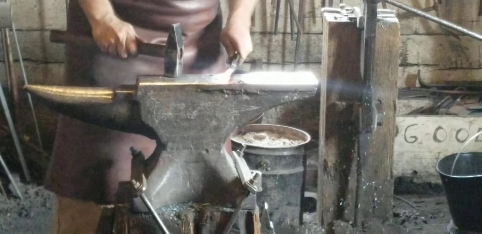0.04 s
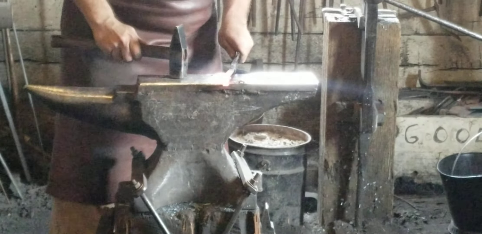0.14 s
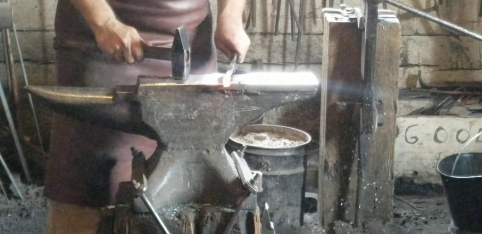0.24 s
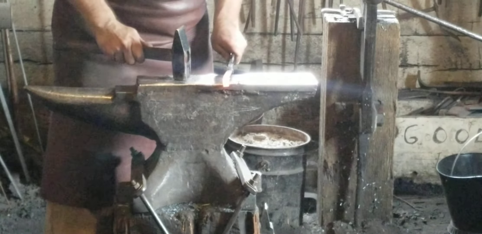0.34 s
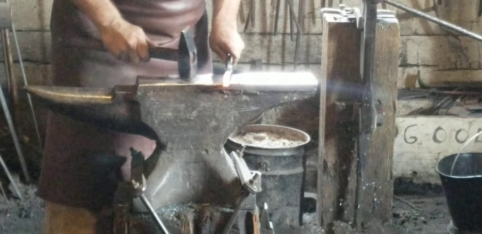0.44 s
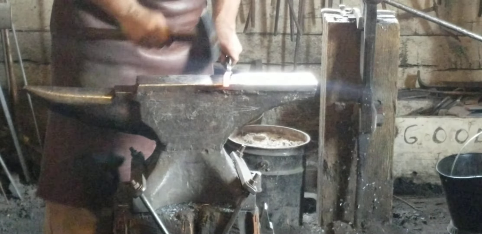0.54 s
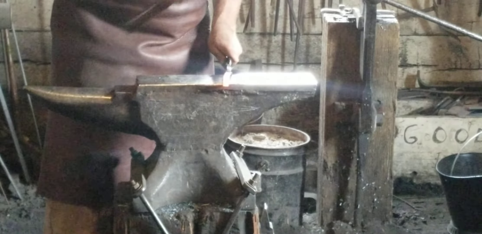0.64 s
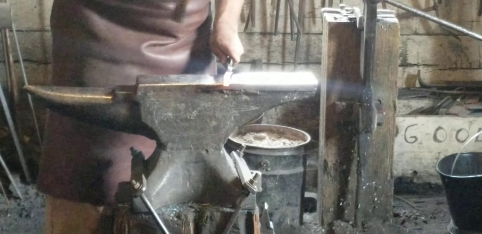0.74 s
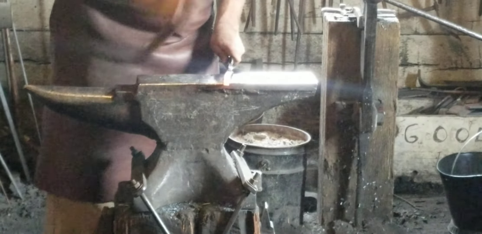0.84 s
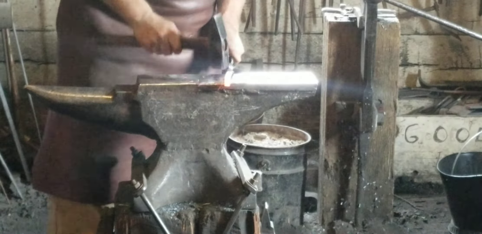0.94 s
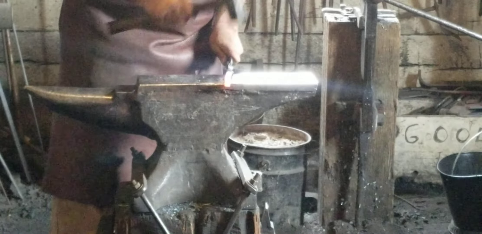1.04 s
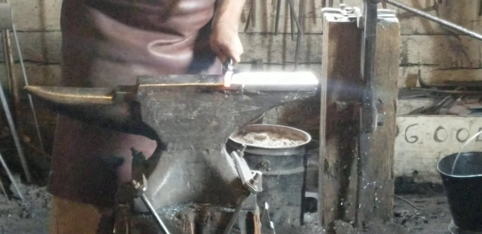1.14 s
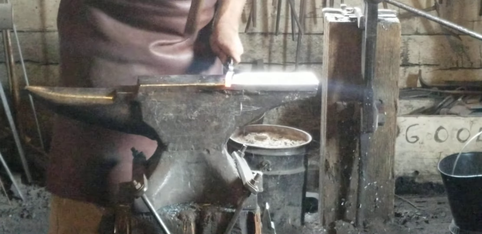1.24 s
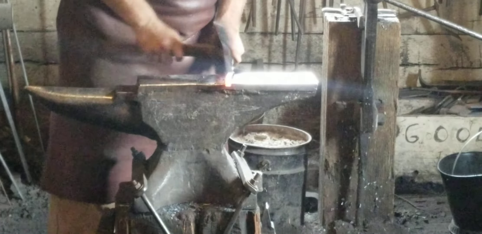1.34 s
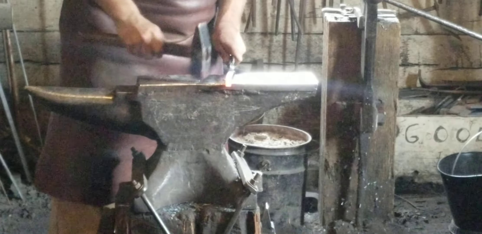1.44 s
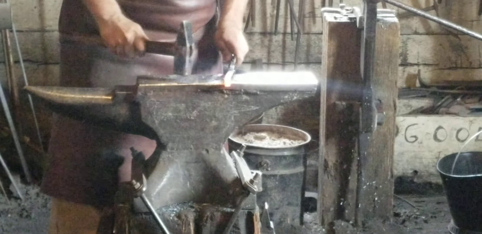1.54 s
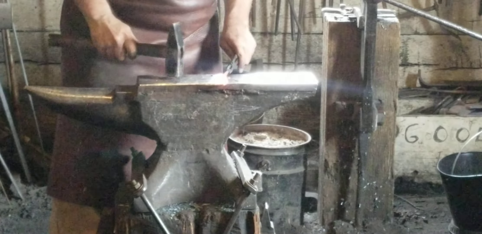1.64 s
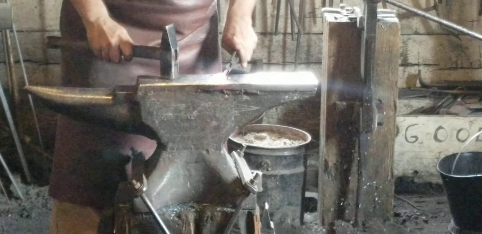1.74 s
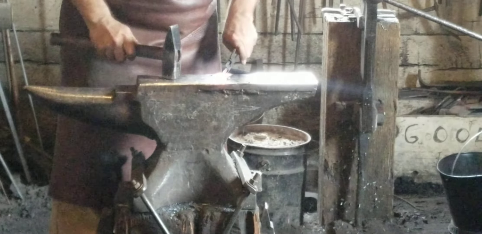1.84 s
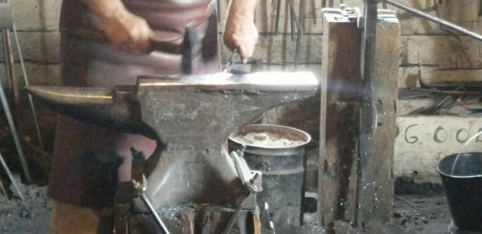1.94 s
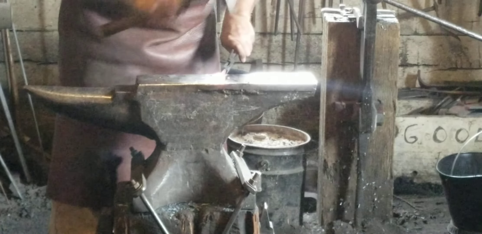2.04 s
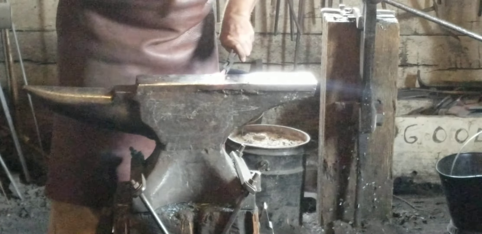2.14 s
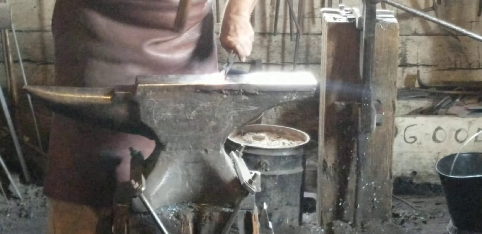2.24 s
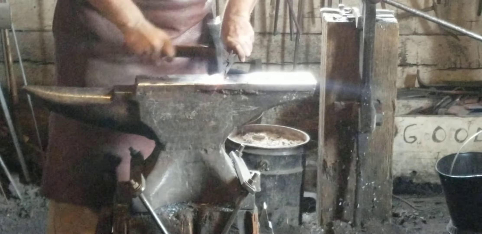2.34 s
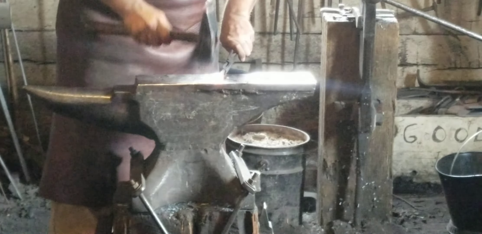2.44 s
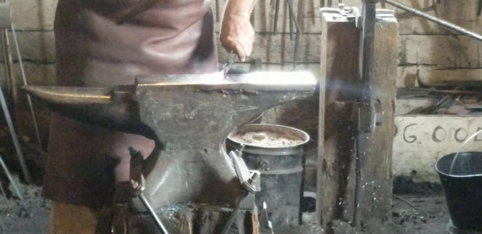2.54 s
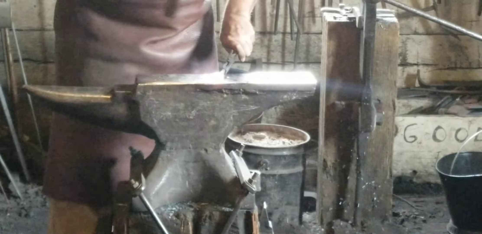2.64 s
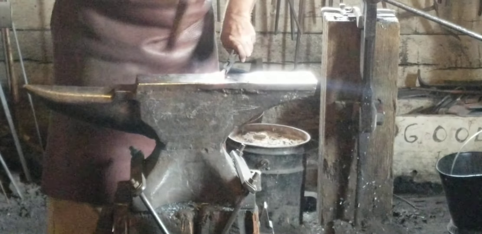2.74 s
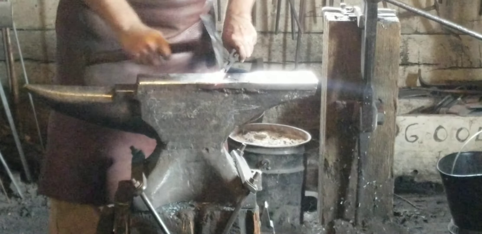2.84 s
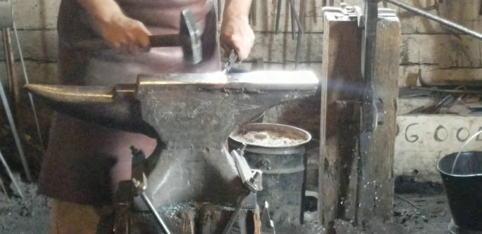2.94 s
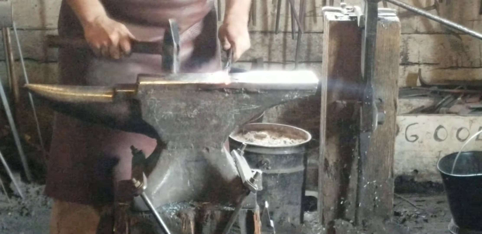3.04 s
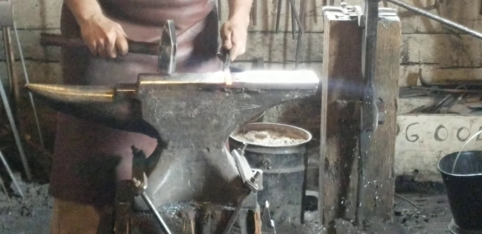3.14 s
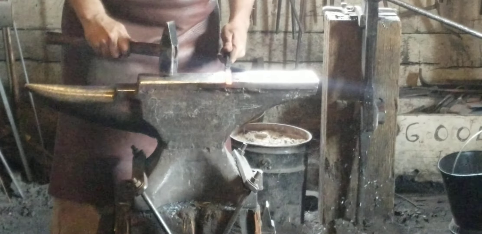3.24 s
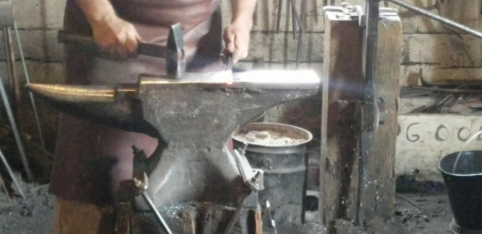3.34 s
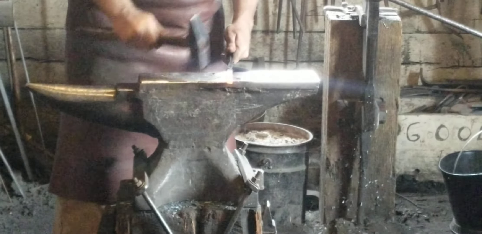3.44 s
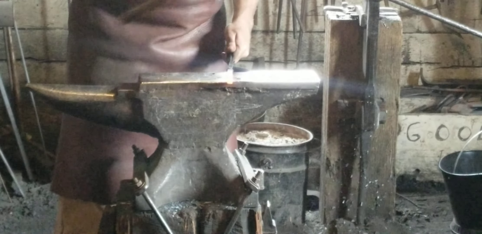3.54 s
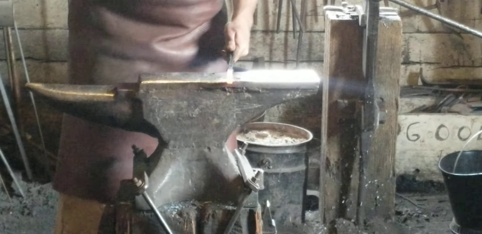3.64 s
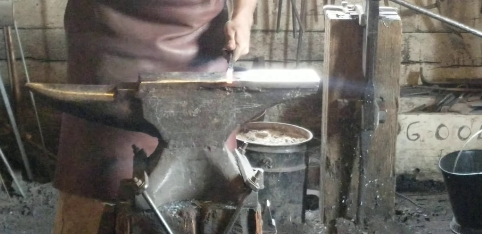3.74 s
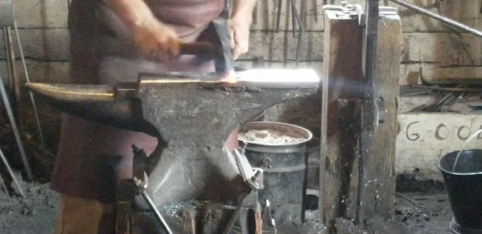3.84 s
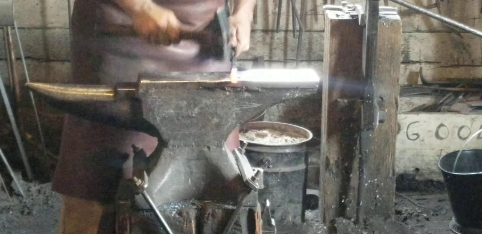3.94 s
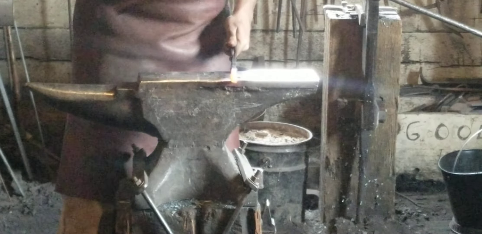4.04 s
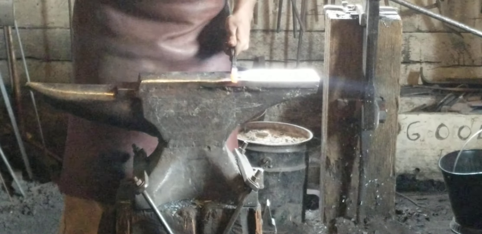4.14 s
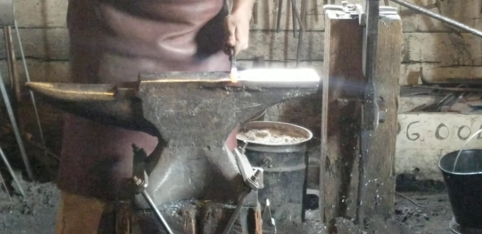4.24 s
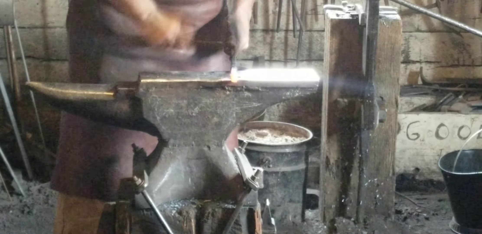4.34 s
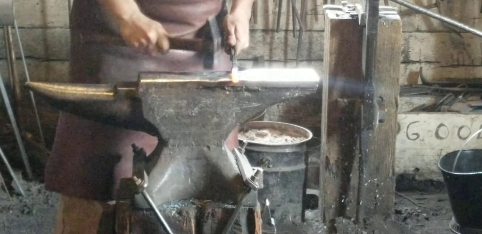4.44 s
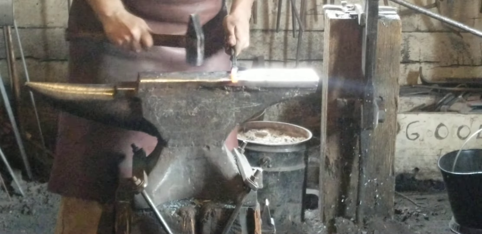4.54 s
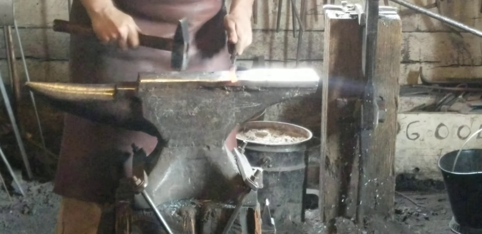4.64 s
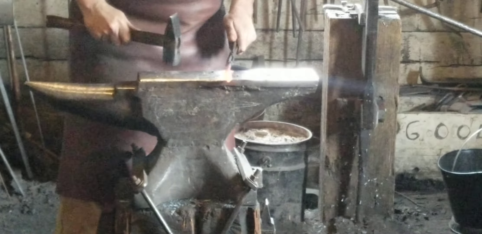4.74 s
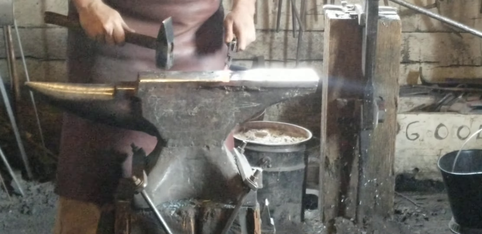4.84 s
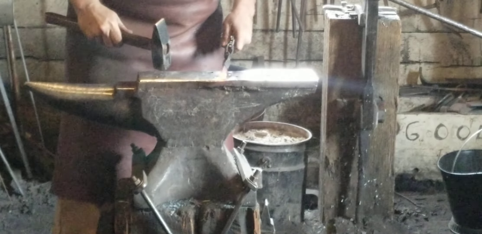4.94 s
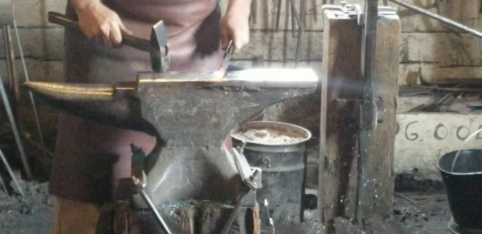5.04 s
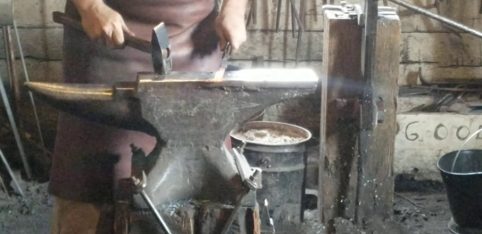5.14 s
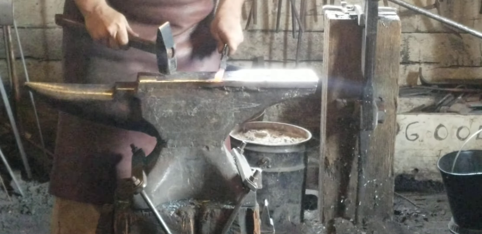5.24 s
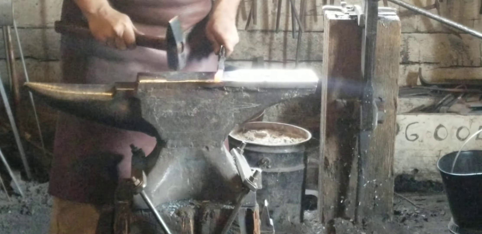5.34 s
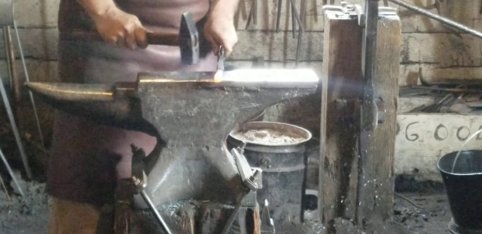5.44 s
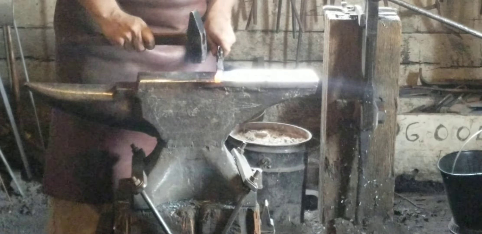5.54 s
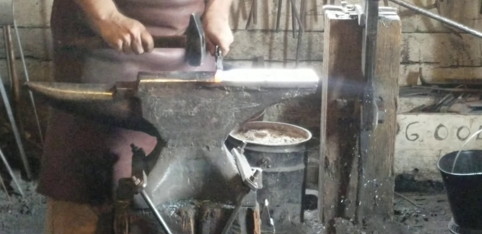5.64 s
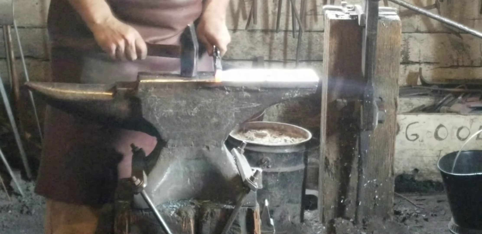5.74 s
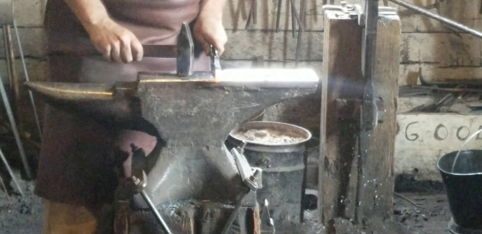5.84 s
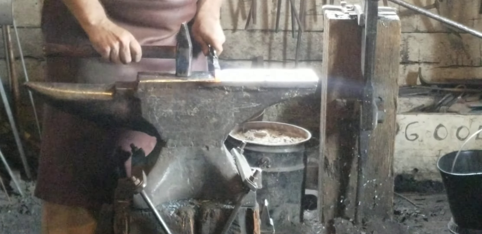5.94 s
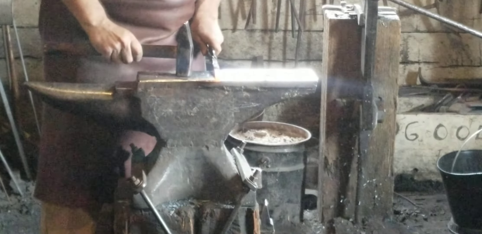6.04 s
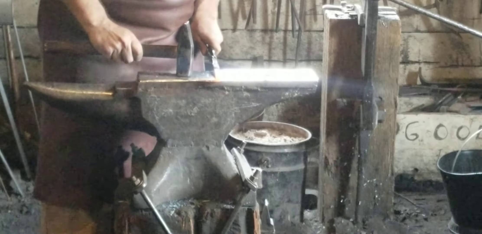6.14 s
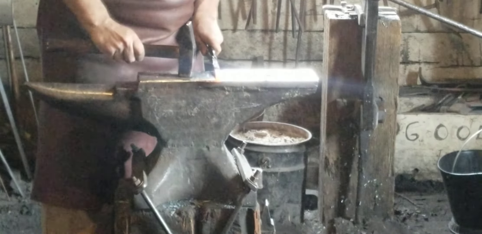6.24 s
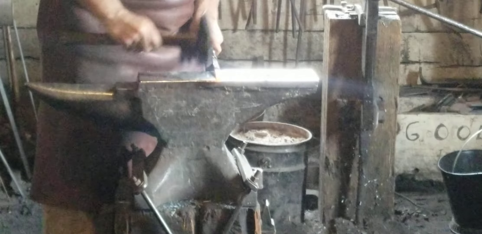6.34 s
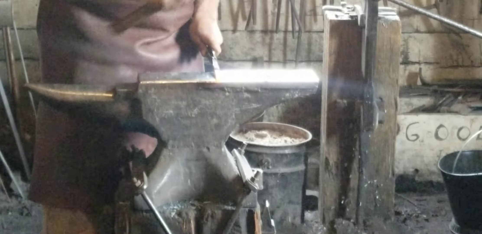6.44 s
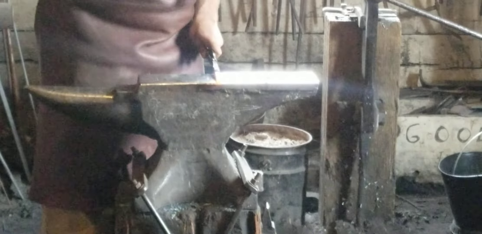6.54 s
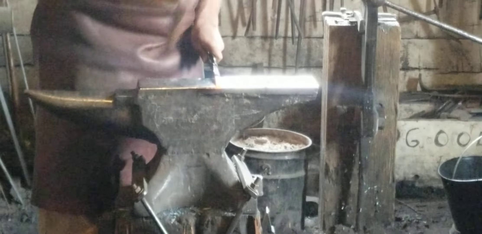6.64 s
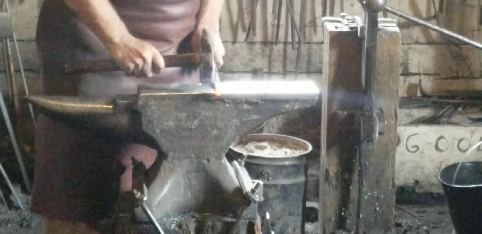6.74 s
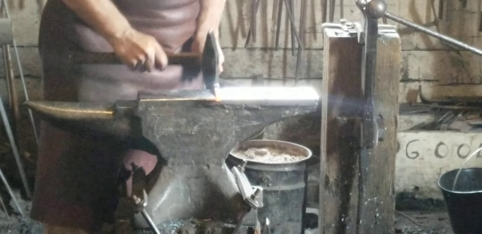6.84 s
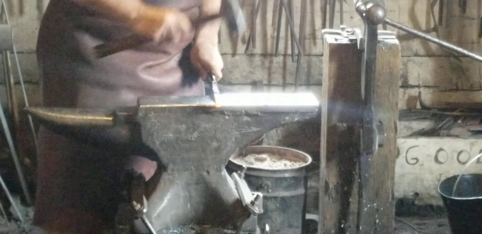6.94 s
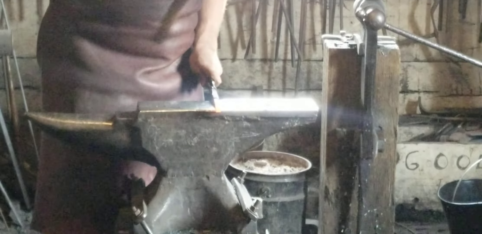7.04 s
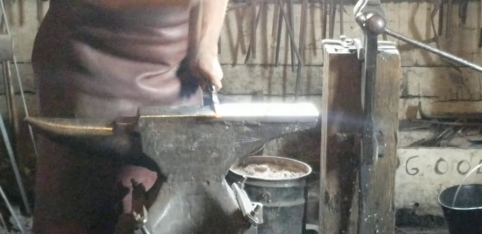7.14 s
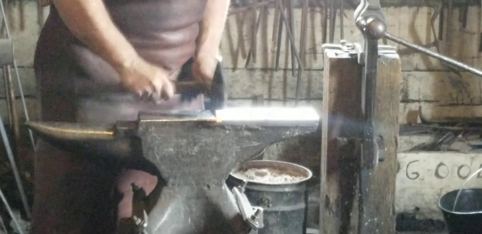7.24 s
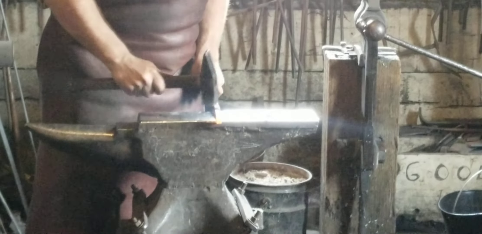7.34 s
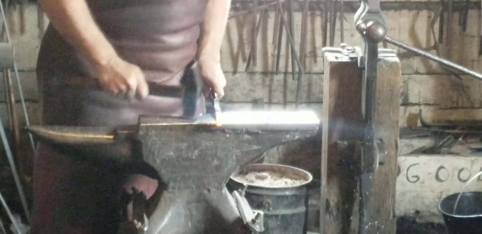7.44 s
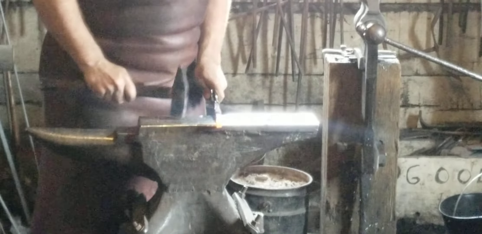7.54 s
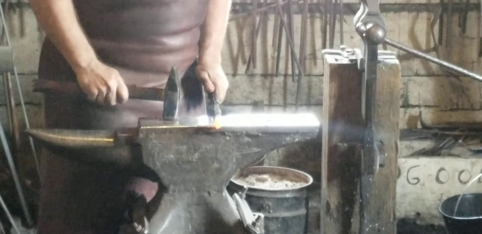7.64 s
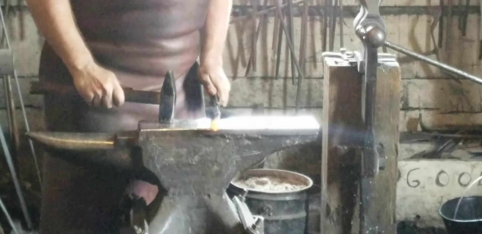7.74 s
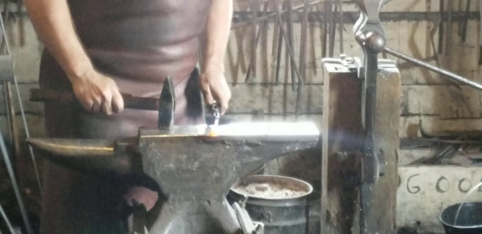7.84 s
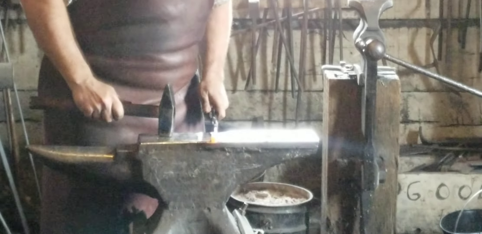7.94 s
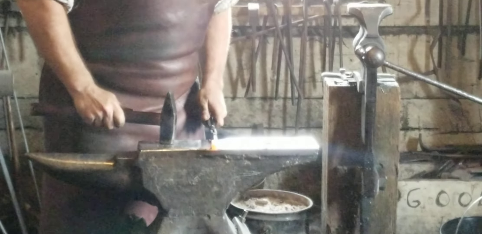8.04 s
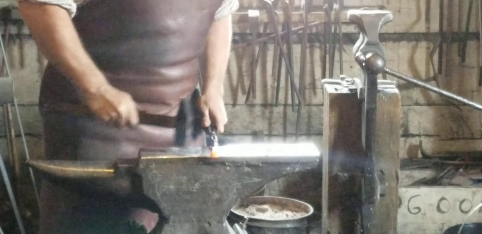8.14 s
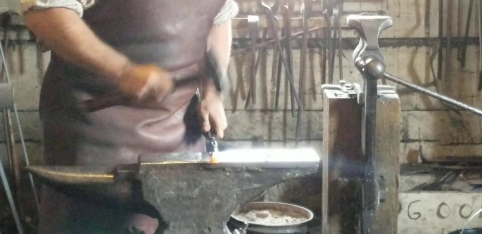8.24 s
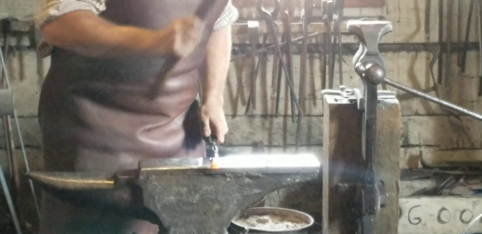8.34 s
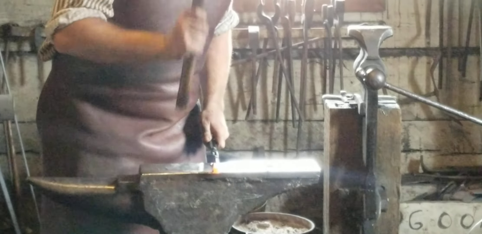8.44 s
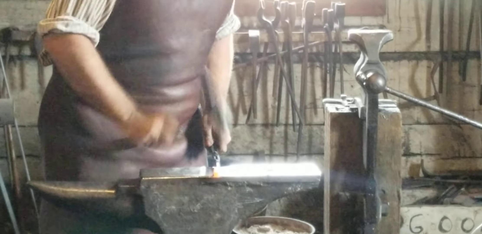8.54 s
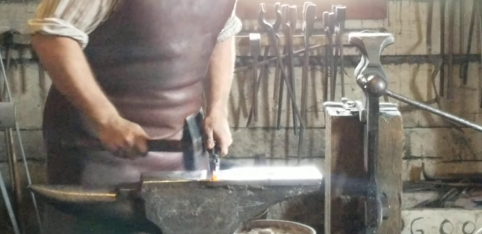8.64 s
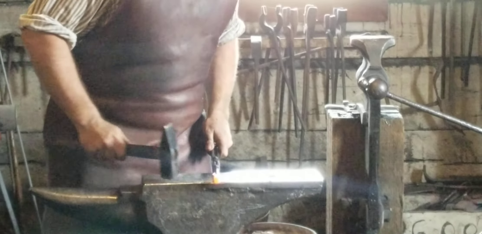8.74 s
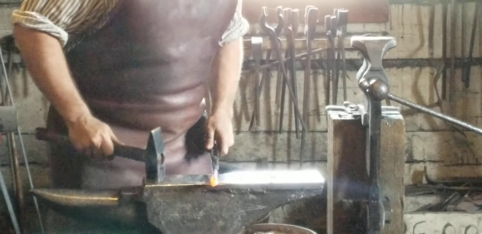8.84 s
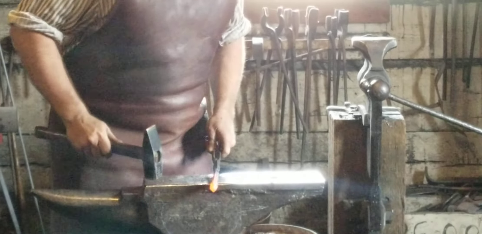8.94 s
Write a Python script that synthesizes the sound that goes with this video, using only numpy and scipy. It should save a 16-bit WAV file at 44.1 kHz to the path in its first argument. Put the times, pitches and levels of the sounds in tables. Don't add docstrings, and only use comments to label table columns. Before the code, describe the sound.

A hand hammer strikes steel on an anvil in spaced pairs of sharp clanks with lighter bounces, over a low blower hum in a workshop.

```python
import sys
import numpy as np
from scipy import signal
from scipy.fft import rfft, irfft
from scipy.io import wavfile
from scipy.ndimage import uniform_filter1d

SR = 44100
rng = np.random.default_rng(int(sys.argv[2]) if len(sys.argv) > 2 else 0)


def store_wav(level_fs):
    pcm = np.round(np.clip(np.atleast_2d(level_fs), -1, 1) * 32767)
    wavfile.write(sys.argv[1], SR, pcm.T.astype(np.int16))


def invert_db(x):
    u = np.asarray(x, float) / 20
    return 10 ** u


N = 396018
TIME_S = np.arange(N) / SR

# start_s, crack_db, anvil_db, head_db, tongs_db
BLOWS = [
    (0.9, -24, -20, -56, -44.5),
    (1.348, -19, -17, -63.5, -47.5),
    (2.35, -21, -16.5, -55.5, -32.5),
    (2.833, -18.5, -15, -38.5, -61),
    (3.848, -21, -17, -61.5, -31.5),
    (4.36, -18.5, -16, -46.5, -21.5),
    (6.719, -27, -28.5, -81, -39),
    (7.25, -20, -16.5, -48.5, -47.5),
    (8.568, -21, -26, -39, -39),
]
# start_s, crack_db, heel_db, anvil_db, tongs_db
BOUNCES = [
    (1.6096, -33, -77, -46, -42),
    (1.6876, -31, -39.5, -37, -31),
    (3.036, -30, -41.5, -64, -32.5),
    (3.15, -32.5, -71, -34, -43.5),
    (4.6558, -34.5, -74, -33.5, -39.5),
    (5.7534, -35.5, -41.5, -52, -73),
    (7.4633, -35, -43, -44.9, -71),
    (7.5717, -34.5, -41, -70, -56),
]
# pitch_hz, level_db, t60_s
ANVIL_MODES = [(1650, -15, .15), (1950, -11, .2), (2394, -10, .15), (2475, -7, .14), (2507, 0, .15),
               (2525, -9, .22), (3290, -17, .15), (5790, -20, .2)]
# pitch_hz, level_db, t60_s
HEEL_MODES = [(1309, -7, .6), (1319, 0, .85), (1502, -10, .5), (1800, -14, .3), (3876, -20, .25)]
# pitch_hz, level_db, t60_s
HEAD_MODES = [(8510, -3, .3), (10480, -2.5, .3), (13110, -5, .2), (13150, 0, .3)]
# pitch_hz, level_db, t60_s
TONGS_MODES = [(10146, -11, .3), (10158, 0, .48)]
BLOW_S = np.array(BLOWS)[:, 0]


def rms_one(x):
    return x / np.sqrt(np.mean(x ** 2) + 1e-20)


def at_hz(points, hz):
    point_hz, value = np.transpose(points)
    return np.interp(np.log(hz + 1), np.log(point_hz), value)


def shares(centres_hz, size):
    log_hz = np.log(np.fft.rfftfreq(size, 1 / SR) + 1)
    return [np.interp(log_hz, np.log(centres_hz), row) for row in np.eye(len(centres_hz))]


def band(x, low_hz, high_hz):
    return signal.sosfilt(signal.butter(2, [low_hz, high_hz], "band", fs=SR, output="sos"), x)


def drift(rate_hz):
    steps = rng.standard_normal(1000)
    return np.interp(TIME_S * rate_hz, np.arange(len(steps)), steps)


def clicks(times_s, db):
    out = np.full(N, 1e-18)
    out[np.round(np.array(times_s) * SR).astype(int)] = invert_db(np.array(db))
    return out


def stereo_noise(spectrum, likeness, size):
    hz = np.fft.rfftfreq(size, 1 / SR)
    mid, side = rfft(rng.standard_normal((2, size)))
    alike = np.clip(at_hz(likeness, hz), -1, 1)
    pair = np.sqrt(1 + alike) * mid + np.sqrt(1 - alike) * side * [[1], [-1]]
    return rms_one(irfft(pair * invert_db(at_hz(spectrum, hz)), size))


def blows():
    s, crack_db, anvil_db, head_db, tongs_db = np.transpose(BLOWS)
    top_db = crack_db - 12
    body_db = (crack_db + top_db) / 2 + 37.5
    anvil = ring(s, anvil_db + 4, ANVIL_MODES, spread_db=-1.0, hold=3.8)
    bodies = ring(s, crack_db - 18.5, HEEL_MODES, spread_db=-4.5, hold=0.49)
    bodies += ring(s, head_db + 19, HEAD_MODES, spread_db=0.5, hold=0.35)
    bodies += ring(s, tongs_db + 3.0, TONGS_MODES, spread_db=4.5, hold=0.93)
    cracks = crack(s, crack_db + 31.5, body_db, top_db + 42.5, chatter_s=0.005, chatter_db=-14.5)
    return sum(cracks) + bodies, free_ring(anvil)


def free_ring(x):
    swell_s, free_s, damping_s = 0.008, 0.057, 0.0085
    latest = np.maximum(np.searchsorted(BLOW_S, TIME_S, "right") - 1, 0)
    since_s = TIME_S - BLOW_S[latest]
    swell = 1 - np.exp(-np.abs(since_s) / swell_s)
    choke = 1 + np.exp(np.clip((since_s - free_s) / damping_s, -30, 30))
    return x * swell / choke * invert_db(np.array([[-1.5], [1.5]]))


def bounces():
    # start_s, crack_db, heel_db, anvil_db,
    # tongs_db
    rebounds = [
        (1.0237, -71, -49, -55, -46),
        (1.4851, -35, -38, -24.5, -86),
        (3.2293, -36, -43, -51, -58),
        (3.9699, -51.5, -61, -55, -39.5),
        (5.8413, -40, -46.5, -39, -77.5),
        (8.7194, -36, -44, -32, -70),
        (8.86, -38, -49, -43, -61),
    ]
    # pitch_hz, level_db, t60_s
    horn_modes = [(4555, 0, .5), (4578, -4, .35)]
    # start_s, level_db
    horn_rings = [(1.348, -44.5), (1.485, -53.5), (1.608, -47), (1.689, -56), (2.833, -33.5), (3.035, -37),
                  (3.149, -47.5), (3.229, -49.5), (3.848, -41.5), (4.361, -44), (5.755, -67), (7.464, -49),
                  (7.569, -53), (8.721, -56)]
    # hammer head under the crack, in dB; it rings little in the rebounds and last hops
    rows = [(*row, 15.5) for row in BOUNCES] + [(*row, 30) for row in rebounds]
    s, crack_db, heel_db, anvil_db, tongs_db, under_db = np.transpose(sorted(rows))
    head_db = crack_db - under_db
    loud = ring(s, anvil_db - 1.5, ANVIL_MODES, spread_db=3.0, hold=0.95)
    loud += ring(s, tongs_db + 2.0, TONGS_MODES, spread_db=-1, hold=1.0)
    close = ring(s, heel_db, HEEL_MODES, spread_db=7.5, hold=0.76)
    close += ring(s, head_db + 3, HEAD_MODES, spread_db=2.5, hold=0.98)
    close += invert_db(3.0) * ring(*np.transpose(horn_rings), horn_modes, spread_db=1.5, hold=1.1)
    low, body, tick = crack(s, crack_db + 26.0, crack_db + 29.5, crack_db + 12.5,
                            chatter_s=0.0055, chatter_db=-10.5)
    return low + band(body, 1900, 7000) + loud, close + tick


def ring(times_s, strength_db, modes, spread_db, hold=1):
    chance = np.clip(rng.standard_normal((len(times_s), len(modes))), -1.5, 1.5)
    chance[:, np.argmax(np.array(modes)[:, 1])] = 0
    out = 0
    for (pitch_hz, db, t60_s), luck in zip(modes, chance.T):
        radius = invert_db(-60 / (hold * t60_s * SR))
        angle = 2 * np.pi * pitch_hz / SR
        strike = clicks(times_s, strength_db + db + spread_db * luck)
        poles = [1, -2 * radius * np.cos(angle), radius * radius]
        out = out + signal.lfilter([0, np.sin(angle)], poles, strike)
    return out


def crack(times_s, low_db, body_db, top_db, chatter_s, chatter_db):
    late = rng.random((len(times_s), 10))
    out = []
    for db, click in zip((low_db, body_db, top_db), contacts()):
        train = clicks(times_s, db)
        for k in range(10):
            chatter = clicks(times_s + chatter_s * late[:, k], db + chatter_db - 9 * late[:, k])
            train = train + (-1) ** k * chatter
        out.append(signal.oaconvolve(train, click)[32:N + 32])
    return out


def contacts():
    # pitch_hz, level_db (per Hz)
    colour = [(400, -2), (700, -1.5), (1200, 10), (2000, 11), (3000, -8.5), (6000, -14.5), (8000, -15.5),
              (9200, -28), (10400, -14), (13500, -17.5), (15800, -28.5)]
    cepstrum = irfft(np.log(invert_db(at_hz(colour, np.fft.rfftfreq(2048, 1 / SR)))))
    cepstrum[1:1024] *= 2
    cepstrum[1025:] = 0
    spectrum = np.exp(rfft(cepstrum))
    a, b, c, d, e = shares([2000, 3200, 8000, 10000, 20000], size=2048)
    parts = [np.roll(irfft(spectrum * share), 32)[:1024] for share in (a, b + c, d + e)]
    return [part / np.sqrt(np.sum(part ** 2)) for part in parts]


def stump(thud_db=21, boom_db=-31, boom_hz=64, late_s=0.23, wide_s=0.047):
    full = clicks(BLOW_S, np.zeros(len(BLOWS)))
    bounce_s, crack_db = np.array(BOUNCES)[:, :2].T
    light = clicks(bounce_s, crack_db + 17.5)
    thud = invert_db(thud_db) * band(full + light, 92, 310)
    t = np.arange(SR // 2) / SR
    hump = np.exp(-((t - late_s) / wide_s) ** 2)
    boom = invert_db(boom_db) * hump * np.sin(2 * np.pi * boom_hz * t)
    return thud, signal.fftconvolve(full, boom)[:N]


def tools():
    # start_s, crack_db, top_db, knock_db
    touches = [(1.889, -69.5, -62, -82), (1.905, -76, -68.5, -80), (2.095, -64.5, -73, -66),
               (3.595, -68, -85, -67), (4.248, -65, -70.5, -78), (4.884, -55.5, -67, -51.5),
               (5.113, -73, -70, -68.5), (5.141, -59.5, -70, -65), (5.168, -56, -49, -46.5),
               (5.191, -54, -63, -47), (5.717, -65, -59, -64), (6.153, -67, -87, -76),
               (7.214, -64.5, -68, -51), (7.975, -78, -65.5, -88.5), (7.990, -71, -69.5, -78),
               (8.015, -69, -52.5, -75), (8.030, -59.5, -56, -62), (8.038, -73, -58.5, -72),
               (8.407, -73, -97.5, -45)]
    s, crack_db, top_db, knock_db = np.transpose(touches)
    grit = rng.standard_normal((2, 2, N)) * invert_db(2.5 * drift(60))
    top_level, body_level = uniform_filter1d(strokes(), size=600)
    hiss = rms_one(band(grit[0], 10300, 15800))
    rough = rms_one(band(grit[1], 1900, 3200) + invert_db(-7.0) * band(grit[1], 2000, 5700))
    scrape = invert_db(-0.1) * top_level * hiss + invert_db(-0.5) * body_level * rough
    low, body, top = crack(s, knock_db + 27.5, crack_db + 32.5, top_db + 25.5,
                           chatter_s=0.0081, chatter_db=-15.5)
    return band(low, 300, 2300) * invert_db(3.5) + band(body, 2100, 5500) + top, scrape


def strokes():
    # loudest_s, rise_s, fall_s, top_db, body_db
    drags = [(0.0, .05, 1.1, -80, -65.5), (2.12, 0.08, .3, -72.5, -54.5), (3.61, .02, .6, -72, -58.5),
             (4.27, 0.17, .25, -71.5, -63.5), (5.15, 0.0088, 0.11, -54, -45),
             (5.212, .12, 0.26, -53.5, -42), (5.745, .13, .03, -69, -51.5),
             (6.24, 0.15, 0.322, -82.5, -63.5), (6.69, .1, 0.09, -79, -61), (7.76, .03, .3, -71, -57.5),
             (8.08, .05, 0.38, -80.5, -75.5), (8.28, 0.3, 0.21, -72, -60), (8.42, 0.052, .35, -92, -65.5)]
    out = 0
    for s, rise_s, fall_s, top_db, body_db in drags:
        before = (s - TIME_S) / max(rise_s, 0.005)
        after = (TIME_S - s) / max(fall_s, 0.005)
        away = np.where(TIME_S < s, before, after)
        out = out + invert_db(np.array([[top_db], [body_db]]) - 30 * np.minimum(away, 5))
    return out


def workshop(x, early_db=6, early_s=0.067, build_s=0.0015):
    # pitch_hz, t60_s
    decay = [(150, 0.86), (700, 0.74), (1800, 0.74), (3500, 0.59), (7000, 0.46), (13000, 0.29)]
    # pitch_hz, likeness (-1 to 1)
    room_likeness = [(150, 0.96), (400, 0.91), (800, 0.034), (2500, 0.1), (12000, .05)]
    t = np.arange(SR) / SR
    noise = rfft(stereo_noise([(100, 0), (9000, 0)], room_likeness, SR))
    centres_hz, t60_s = np.transpose(decay)
    echo = 0
    for share, t60 in zip(shares(centres_hz, SR), t60_s):
        echo = echo + irfft(noise * share, SR) * invert_db(-60 * t / t60)
    echo = echo * (1 - np.exp(-t / build_s)) * invert_db(early_db * np.exp(-(t / early_s) ** 2))
    echo = echo / np.sqrt(np.sum(echo ** 2) / 2)
    return signal.fftconvolve(x[None], echo, axes=1)[:, :N]


def blower():
    # start_s, rumble_db
    draught = [
        (0.0, -34.5),
        (0.9, -34.5),
        (1.9, -39),
        (2.9, -41),
        (4.9, -39.5),
        (6.4, -41.5),
        (7.3, -35.5),
        (8.2, -40),
        (8.98, -38),
    ]
    # pitch_hz, level_db (per Hz)
    rumble_colour = [(13, -51.5), (22, -24), (54, -3), (79, 0), (108, 1), (156, -5.5), (173, -7), (201, -7),
                     (279, -10.5), (319, -13), (345, -9), (374, -13), (426, -19.5), (480, -37.5),
                     (520, -32.5), (680, -58), (1140, -120)]
    # pitch_hz, level_db (per Hz)
    murk_colour = [(300, -25.5), (480, 0), (1150, -7.5), (2000, -16.5), (2600, -21), (3300, -31.5),
                   (6300, -34.5), (7600, -33.5), (8600, -49), (9800, -45.5), (10600, -39.5), (13000, -35.5),
                   (15650, -35.5), (15900, -58.5)]
    # pitch_hz, likeness (-1 to 1)
    likeness = [(60, 0.97), (180, 0.98), (550, 0.68), (1650, 0.28), (4970, -0.99), (15000, 0.31)]
    # pitch_hz, width_hz, level_db (rms)
    hums = [(119.56, 16, -45), (65.4, 10, -59), (175, 18, -51.5), (428, 32, -55.5)]
    draught_db = np.interp(TIME_S, *np.transpose(draught))
    shaken = shake()
    rumble_db = draught_db + 3 * shaken
    murk_db = -56.5 + 0.55 * (draught_db + 37.5) + 12 * shaken
    lumps_db = -2.0 + 1.2 * drift(9) + np.array([[0.35], [-0.35]])
    rumble = invert_db(lumps_db) * stereo_noise(rumble_colour, likeness, N)
    for hz, width_hz, db in hums:
        rumble += invert_db(db + 38) * rms_one(band(rng.standard_normal(N), hz - width_hz / 2, hz + width_hz / 2))
    murk = invert_db(murk_db + 2.5 * drift(3.9)) * stereo_noise(murk_colour, likeness, N)
    return invert_db(rumble_db) * rumble + murk


def shake(late_s=0.13, wide_s=0.15):
    return sum(np.exp(-((TIME_S - s - late_s) / wide_s) ** 2) for s in BLOW_S)


def scene():
    thud, boom = stump()
    clinks, scrape = tools()
    heavy, anvil = blows()
    light, close = bounces()
    near = invert_db(-10.0) * heavy + invert_db(-9.0) * light + invert_db(-3) * close + invert_db(-1.0) * clinks
    send = heavy + invert_db(-12) * anvil[1] + light + invert_db(-2.5) * close + invert_db(-2.5) * clinks
    stance = np.searchsorted(BLOW_S - 0.002, TIME_S) % 3
    echoes = sum(workshop(send * (stance == k)) for k in range(3))
    direct = np.stack([np.roll(near, 10), near])
    steel = (direct + echoes + invert_db(-2) * anvil) * invert_db(np.array([[-1.7], [1.7]]))
    steel += invert_db(-17.5) * band(steel, 300, 650) * [[1], [-1]]
    return steel + invert_db(3.5) * thud + invert_db(5.5) * workshop(thud) + boom + scrape + blower()


def top_cut(x):
    return signal.sosfilt(signal.butter(12, 17030, fs=SR, output="sos"), x)


def record(dry):
    cut = signal.sosfilt(signal.cheby1(8, 0.5, 16300, fs=SR, output="sos"), dry)
    return top_cut(1.025 * np.tanh(cut / 0.95))


dry = scene()
out = record(dry)
store_wav(out)
```